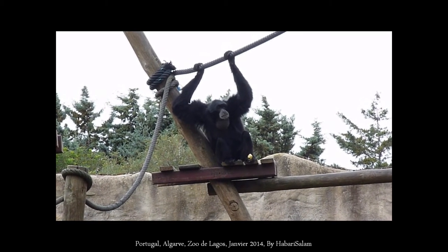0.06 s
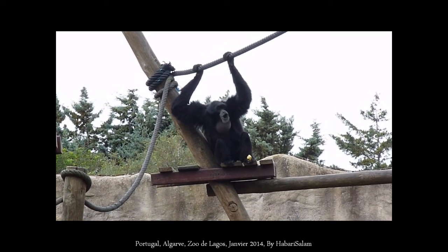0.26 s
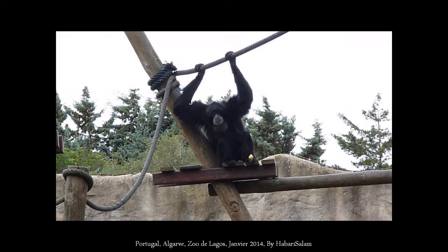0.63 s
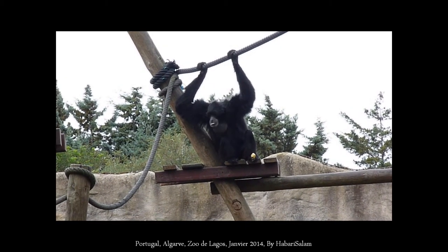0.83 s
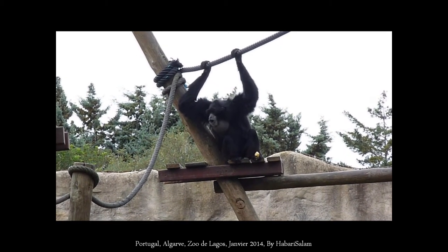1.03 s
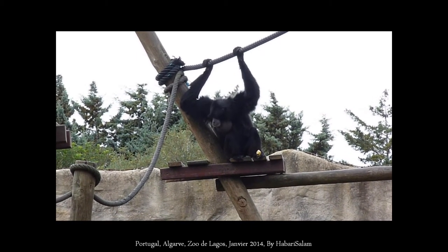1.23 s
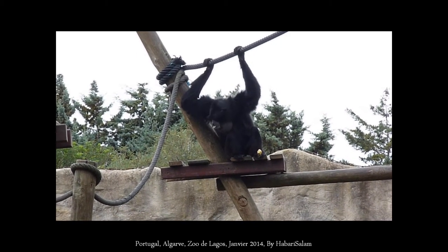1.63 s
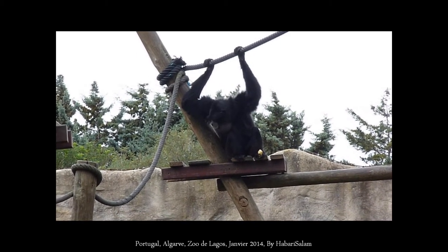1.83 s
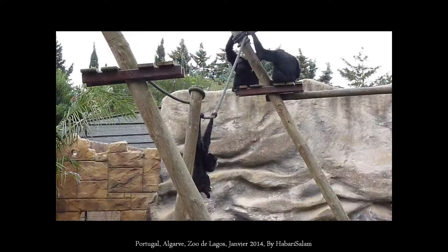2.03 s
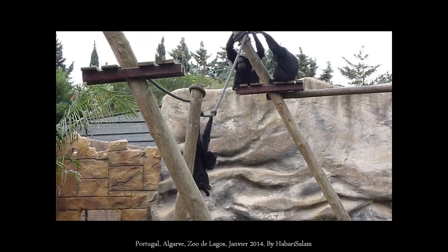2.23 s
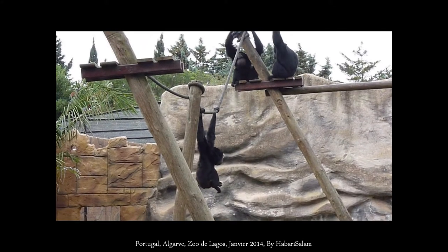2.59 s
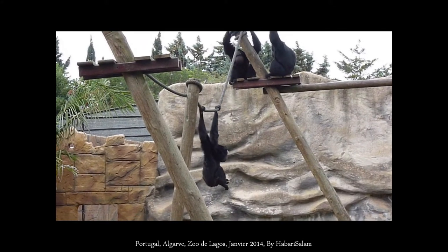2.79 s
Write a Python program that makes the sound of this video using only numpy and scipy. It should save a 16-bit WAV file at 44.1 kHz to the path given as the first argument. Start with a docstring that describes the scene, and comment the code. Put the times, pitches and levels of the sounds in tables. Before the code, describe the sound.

Apes call in an outdoor zoo enclosure, their barks echoing briefly off the walls. One hoots and barks twice, then the microphone position changes and two overlap with barks and a longer rising hoot, over low, steady background noise.

```python
"""Siamangs in a rock-walled enclosure

Each low, nearly pure hoot swells in the throat sac and breaks into an arched, harmonic bark that the
walls reflect. One ape is heard first; after a brief silence, two overlap, heard from another spot.
A limiter holds the loud calls at one level, so the outdoor background ducks and creeps back."""
import sys
import numpy as np
from scipy import signal
from scipy.fft import rfft, irfft
from scipy.io import wavfile
from scipy.ndimage import uniform_filter1d

SR = 44100
rng = np.random.default_rng(int(sys.argv[2]) if len(sys.argv) > 2 else 0)


def master(y):
    """Save y as 16-bit WAV."""
    cut = np.clip(np.atleast_2d(y).T, -1, 1)
    pcm = np.round(cut * 32767)  # scale
    wavfile.write(sys.argv[1], SR, pcm.astype(np.int16))


N = 130095
TIME = np.arange(N) / SR

# Outdoor background spectra at the two spots: (frequency [Hz], relative spectral density [dB])
FIRST_BACKGROUND = [(25, -8), (70, 2), (140, 3), (300, 3), (480, 0), (640, -1), (830, -3), (1250, -1),
                    (1750, -1), (2300, -12.5), (3000, -25), (4200, -30), (7000, -50.5)]
SECOND_BACKGROUND = [(25, -8), (70, -3), (140, 7.5), (300, 3), (480, 5), (830, 0), (1250, -0.5),
                     (1750, -10), (2400, -13.5), (3600, -18.5), (4700, -36), (7000, -43.5)]
# Short hoots: (onset [s], duration [s], starting pitch [Hz], final pitch [Hz], level [dB])
SHORT_HOOTS = [(0.196, 0.14, 262.4, 316.5, -14), (1.038, 0.13, 268.8, 315.5, -12.5),
               (1.963, 0.176, 245, 254.2, -19), (2.009, 0.11, 274, 316.1, -8.5)]
# Contour of one drawn-out hoot: (time [s], pitch [Hz], level [dB])
LONG_HOOT_CONTOUR = [(2.14, 258, -49), (2.17, 262.4, -22), (2.222, 266.8, -24), (2.243, 268, -18.5),
                     (2.275, 270.8, -9.5), (2.305, 269.8, -11.5), (2.345, 276.4, -8), (2.372, 277.4, -16.5),
                     (2.41, 285.4, -11), (2.455, 288.8, -7), (2.495, 293.3, -15), (2.525, 302.8, -14),
                     (2.555, 302.4, -15), (2.578, 313, -15), (2.595, 323.2, -10.5), (2.614, 344, -21),
                     (2.641, 322, -61.5)]
# Overtones of the throat sac at full effort: (harmonic number [-], level re fundamental [dB])
SAC_HARMONICS = [(2, -32.5), (5, -31.5), (6, -42), (8, -43)]
# Wall reflections at the two spots: (delay [s], level [dB])
FIRST_REFLECTIONS = [(.031, -18), (0.046, -11.5), (.105, -23), (.17, -25)]
SECOND_REFLECTIONS = [(.029, -10.5), (.062, -16.5), (.148, -19.5)]
# Spectrum of the reverberant tail: (frequency [Hz], gain [dB])
TAIL_SPECTRUM = [(150, -18.5), (300, -6), (450, -6), (650, 0.5), (1300, -4), (2000, -5.5), (4000, -1.5),
                 (8000, -7)]
# Barks: (time of apex [s], apex pitch [Hz], gain [dB], overtone gain [dB], time stretch [-])
BARK_EVENTS = [(0.357, 682.5, -9, -2, 1.0), (1.187, 667.5, -12.5, 1.5, 0.97),
               (2.016, 645.5, -25.5, 0.5, 0.87), (2.043, 606.6, -29, -2.5, 0.75),
               (2.124, 723.4, -1.5, -15.5, 0.78), (2.154, 708, -6.5, -7.5, .9),
               (2.605, 671.2, -1, -5.5, 0.93)]
# The arch common to all barks: (unstretched time from apex [s], fraction of apex pitch [-],
# gain [dB], gain above the second harmonic [dB], rasp gain [dB])
BARK_ARCH = [(-.04, .78, -39, -2, 9.5), (-.029, .84, -22.5, -0.5, 7.5), (-.016, .96, 2, 2, -3),
             (-.006, .993, 6, -3.5, -12), (.005, .997, 4, -1, -18.5), (.018, .96, 2.5, -5, -8.5),
             (.038, .87, -2, -2.5, -7.5), (0.061, .775, -4, -9, 0), (0.072, 0.687, -12.5, -13.5, -4.5),
             (.1, .58, -22, -5, 1)]
# Resonances of the open mouth: (frequency [Hz], gain [dB])
MOUTH_RESPONSE = [(300, -14), (450, -5), (660, -11), (830, -29), (1060, 0), (1360, -7), (1600, -27.5),
                  (2020, -27), (2350, -31.5), (2700, -37), (3350, -39.5), (3900, -47.5), (4800, -57.5),
                  (6500, -65)]

HOOT_ATTACK_S, HOOT_RELEASE_S, HOOT_JITTER, FULL_EFFORT_DB = 0.071, 0.025, 0.0026, -8.5
ECHO_LOW_CUT_HZ, TAIL_T60_S, TAIL_BUILD_S = 325, 0.79, 0.01
RASP_BASE_DB, RASP_HZ, BARK_JITTER = -27, 357, 0.011
SAC_RING_HZ, SAC_RING_DB, SAC_RING_BASE_S = 315, -16.5, 0.022
LIMIT_DB, LIMIT_RELEASE_DB_PER_S, LIMIT_ATTACK_S, LIMIT_AHEAD_S = -15.5, 16, 0.012, 0.0096
LIMIT_TREBLE_DB, LIMIT_TREBLE_HZ = 5.5, 782   # the limiter reacts more to the bright barks
HISS_DB, WHINE_HZ, WHINE_DB, CUTOFF_HZ = -66.5, 6667, -85.5, 7550
SILENCE_FROM_S, SILENCE_TO_S, SILENCE_FADE_S = 1.9595, 1.995, 0.002


def from_db(db):
    """Amplitude grows tenfold for every 20 dB."""
    return 10 ** (np.asarray(db) / 20)


def unit_rms(x):
    """Normalisation to unit mean power."""
    return x / np.sqrt(np.mean(x ** 2) + 1e-20)


def response_db(spectrum, hz):
    """Interpolation of a spectrum on a logarithmic frequency axis."""
    knots_hz, db = np.transpose(spectrum)
    return np.interp(np.log(np.maximum(hz, 1)), np.log(knots_hz), db)


def drift(corner_hz):
    """Low-pass filtering turns white noise into a smooth fluctuation of unit rms."""
    pole = np.exp(-2 * np.pi * corner_hz / SR)
    wander = signal.lfilter([1], [1, -2 * pole, pole * pole], rng.standard_normal(N + SR))
    return unit_rms(wander[SR:])


def coloured_noise(samples, spectrum):
    """Spectral weighting gives white noise a colour."""
    gain = from_db(response_db(spectrum, np.fft.rfftfreq(samples, 1 / SR)))
    return irfft(rfft(rng.standard_normal(samples)) * gain, samples)


def high_pass(x, hz):
    """A second-order filter attenuates by 12 dB per octave below its corner."""
    return signal.sosfilt(signal.butter(2, hz, "high", fs=SR, output="sos"), x)


def outdoor_background(spectrum, level_db):
    """Slow amplitude modulation makes a steady broadband noise sway a little."""
    noise = unit_rms(coloured_noise(N, spectrum))
    sway_db = 0.7 * drift(corner_hz=1)
    return noise * from_db(level_db + sway_db)


def throat_sac(hz, gain, effort=0):
    """The sac, a resonator, sounds almost a sine; faint overtones grow as the square of effort."""
    phase = 2 * np.pi * np.cumsum(hz * (1 + HOOT_JITTER * drift(corner_hz=40))) / SR
    overtones = sum(from_db(db) * np.sin(k * phase) for k, db in SAC_HARMONICS)
    return gain * (np.sin(phase) + overtones * effort ** 2)


def short_hoots():
    """Amplitude and frequency modulation: each tone of the sac swells as it glides upward."""
    out = np.zeros(N)
    for onset, duration, from_hz, to_hz, level_db in SHORT_HOOTS:
        age = TIME - onset
        swell = np.clip(age / HOOT_ATTACK_S, 0, 1) * np.clip((duration - age) / HOOT_RELEASE_S, 0, 1)
        hz = np.interp(age, [0, duration], [from_hz, to_hz])
        out += throat_sac(hz, from_db(level_db) * swell ** 0.98)
    return out


def enclosure(calls, reflections, tail_db):
    """Direct sound, early wall reflections and an exponentially decaying diffuse field superpose."""
    thinned = high_pass(calls, ECHO_LOW_CUT_HZ)
    echoes = sum(from_db(db) * np.interp(TIME - delay, TIME, thinned, left=0)
                 for delay, db in reflections)
    age = TIME[:SR]
    decay = from_db(-60 * age / TAIL_T60_S) * (1 - np.exp(-age / TAIL_BUILD_S))
    tail = coloured_noise(SR, TAIL_SPECTRUM) * decay / np.sqrt(np.sum(decay ** 2))
    return calls + echoes + from_db(tail_db) * signal.fftconvolve(calls, tail)[:N]


def barks():
    """Source and filter: harmonics arch through the mouth's resonances, raspy, then clear, then dull."""
    out = np.zeros(N)
    arch_s, *contours = np.transpose(BARK_ARCH)
    jitter = 1 + BARK_JITTER * drift(corner_hz=150)
    phase_rasp, amplitude_rasp = drift(RASP_HZ), drift(RASP_HZ)
    for apex_s, apex_hz, gain_db, overtone_db, stretch in BARK_EVENTS:
        from_apex = (TIME - apex_s) / stretch
        on = (from_apex > arch_s[0]) & (from_apex < arch_s[-1])
        fraction, arch_db, upper_db, rasp_db = (np.interp(from_apex[on], arch_s, c) for c in contours)
        hz = apex_hz * uniform_filter1d(fraction, size=400) * jitter[on]
        rasp_depth = from_db(RASP_BASE_DB + rasp_db)
        phase = 2 * np.pi * np.cumsum(hz) / SR + rasp_depth * phase_rasp[on]
        voice = 0
        for k in range(1, 10):
            harmonic_db = response_db(MOUTH_RESPONSE, k * hz) + overtone_db * (k > 1) + upper_db * (k > 2)
            voice += from_db(harmonic_db) * np.sin(k * phase)
        out[on] += voice * (1 + rasp_depth * amplitude_rasp[on]) * from_db(gain_db + arch_db)
        # The sac hums on beneath the apex.
        hum_window = np.cos(np.pi / 2 * np.clip(from_apex / (2 * SAC_RING_BASE_S), -1, 1)) ** 2
        hum = np.sin(2 * np.pi * SAC_RING_HZ * (TIME - apex_s))
        out += from_db(gain_db + SAC_RING_DB) * hum_window * hum
    return out


def long_hoot():
    """Harmonic content follows amplitude: a climbing tone wavers in level, brighter where louder."""
    times, hz, db = np.transpose(LONG_HOOT_CONTOUR)
    gain = from_db(np.interp(TIME, times, db)) * (TIME > times[0]) * (TIME < times[-1])
    return throat_sac(np.interp(TIME, times, hz), gain, effort=gain / from_db(FULL_EFFORT_DB))


def scene():
    """The sound field depends on position: each spot in turn has its own echoes and background."""
    calls = long_hoot() + short_hoots() + barks()
    first = enclosure(calls, FIRST_REFLECTIONS, tail_db=-7.5)
    first += outdoor_background(FIRST_BACKGROUND, level_db=-46)
    second = enclosure(calls, SECOND_REFLECTIONS, tail_db=-5)
    second += outdoor_background(SECOND_BACKGROUND, level_db=-40)
    return np.where(TIME < SILENCE_FROM_S, first, second)[None]


def limiter(x):
    """Automatic gain control: peaks above the threshold lower the gain quickly; it recovers slowly."""
    treble = from_db(LIMIT_TREBLE_DB) * high_pass(x, LIMIT_TREBLE_HZ)
    sensed = np.maximum(np.abs(x), np.abs(treble))
    excess_db = np.maximum(20 * np.log10(sensed + 1e-9) - LIMIT_DB, 0)
    release_db = LIMIT_RELEASE_DB_PER_S * TIME
    held_db = np.maximum.accumulate(excess_db + release_db, axis=-1) - release_db
    ahead_db = np.interp(TIME + LIMIT_AHEAD_S, TIME, held_db[0])
    pole = np.exp(-1 / (LIMIT_ATTACK_S * SR))
    reduction_db = signal.lfilter([1 - pole], [1, -pole], ahead_db)
    return x * from_db(-reduction_db)


def record(dry):
    """Electronic hiss and whine add to the limited sound; the sum is briefly muted and band-limited."""
    hiss = from_db(HISS_DB) * rng.standard_normal(N)
    whine = from_db(WHINE_DB) * np.sin(2 * np.pi * WHINE_HZ * TIME)
    gate = np.clip(np.maximum(SILENCE_FROM_S - TIME, TIME - SILENCE_TO_S) / SILENCE_FADE_S, 0, 1)
    low_pass = signal.ellip(8, .3, 70, CUTOFF_HZ, fs=SR, output="sos")
    return signal.sosfilt(low_pass, (limiter(dry) + hiss + whine) * gate)


dry = scene()
out = record(dry)
master(out)
```